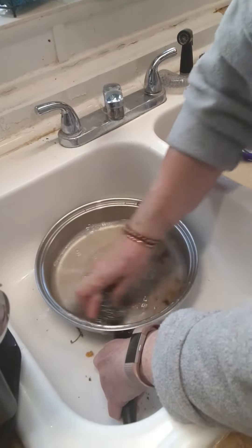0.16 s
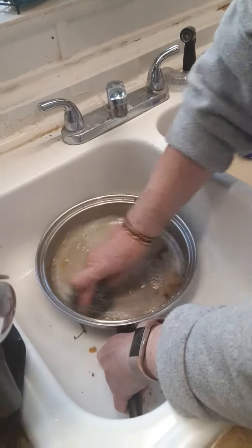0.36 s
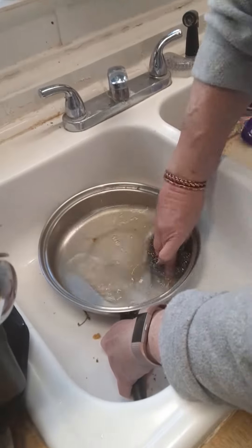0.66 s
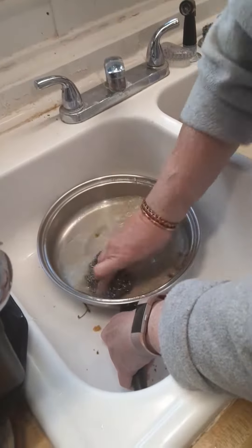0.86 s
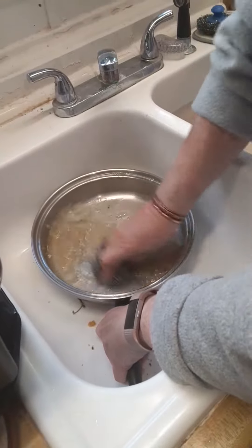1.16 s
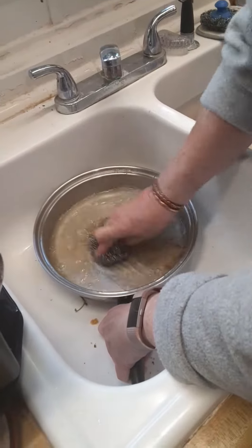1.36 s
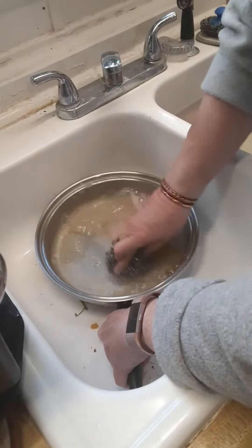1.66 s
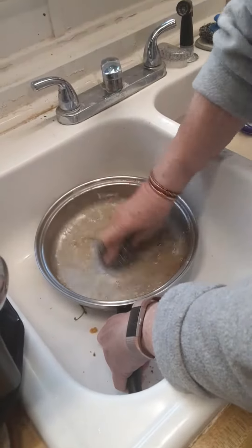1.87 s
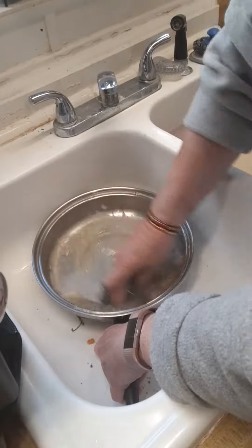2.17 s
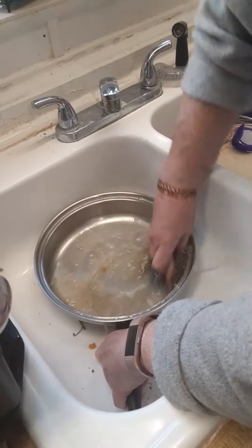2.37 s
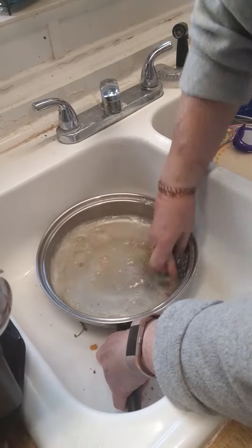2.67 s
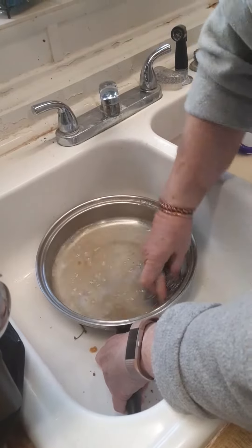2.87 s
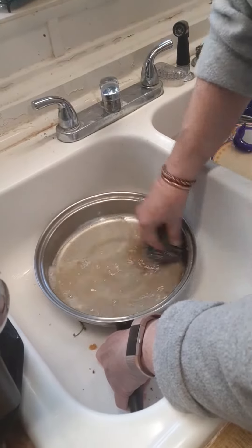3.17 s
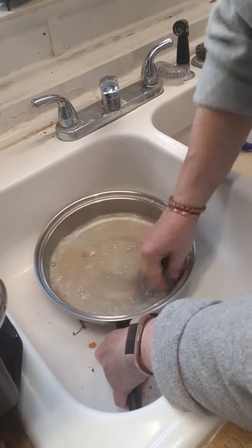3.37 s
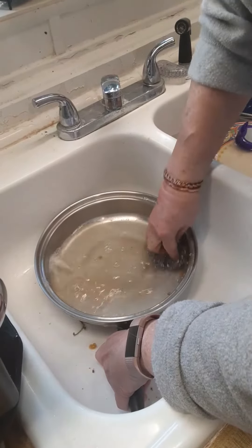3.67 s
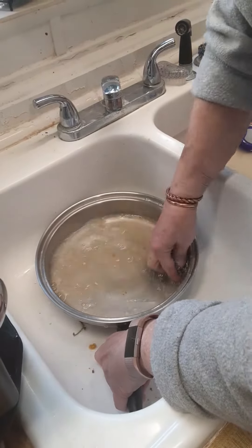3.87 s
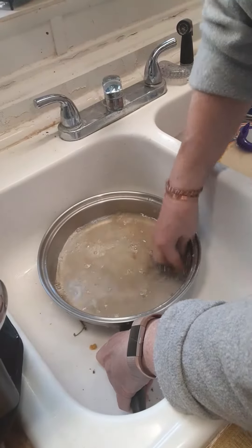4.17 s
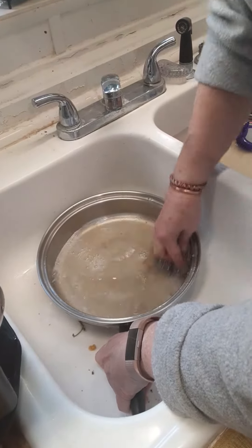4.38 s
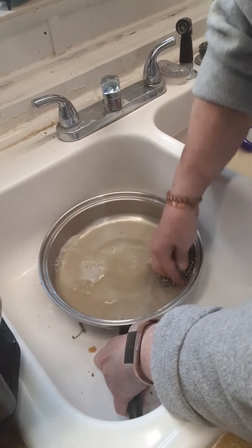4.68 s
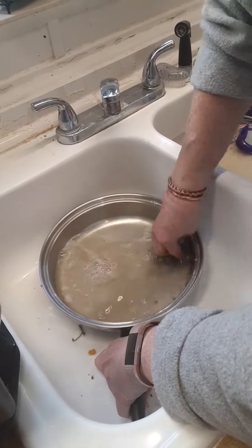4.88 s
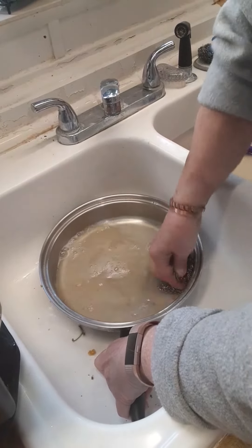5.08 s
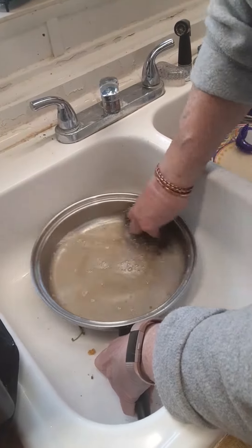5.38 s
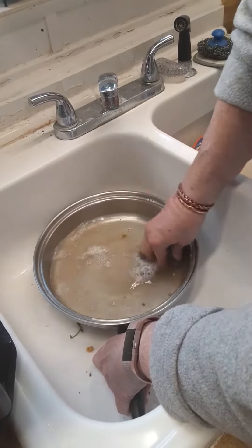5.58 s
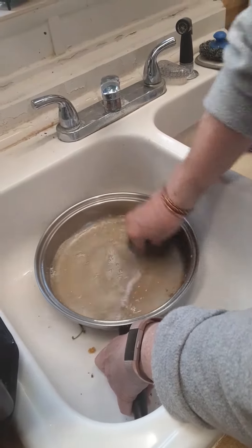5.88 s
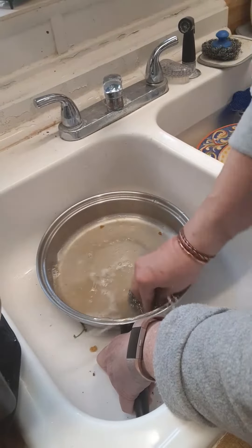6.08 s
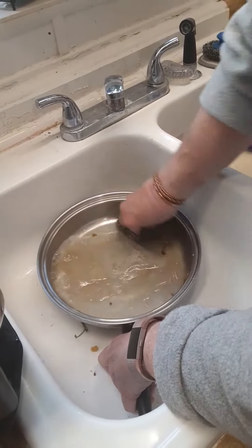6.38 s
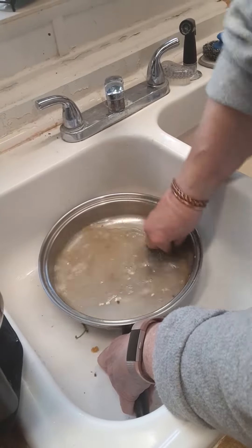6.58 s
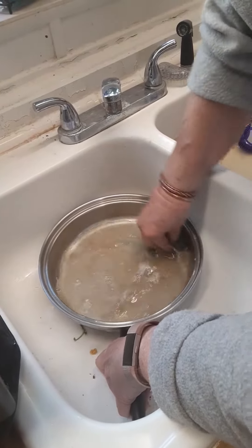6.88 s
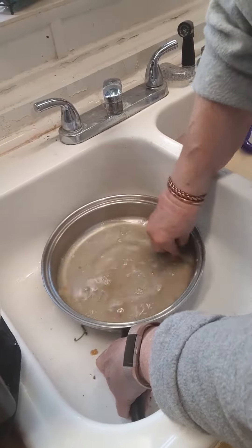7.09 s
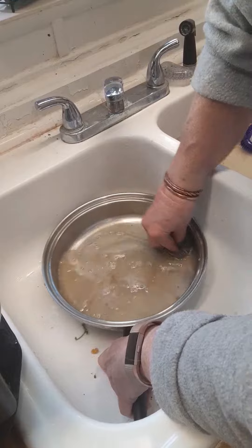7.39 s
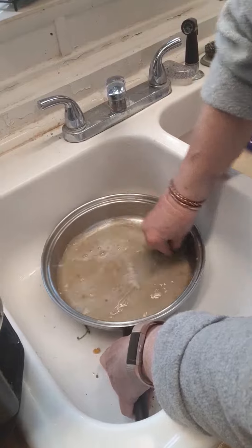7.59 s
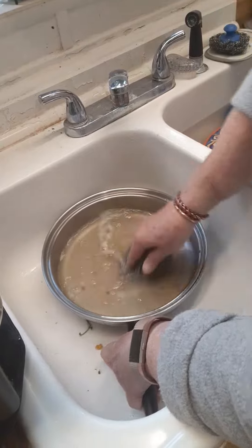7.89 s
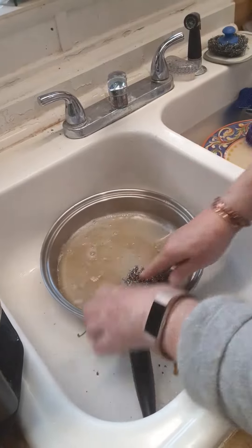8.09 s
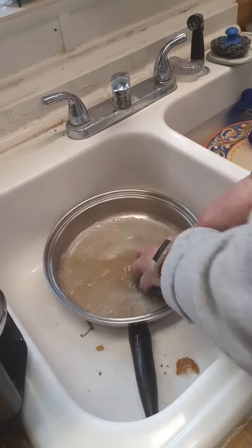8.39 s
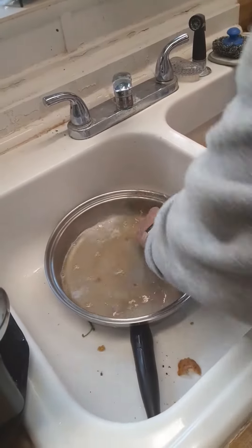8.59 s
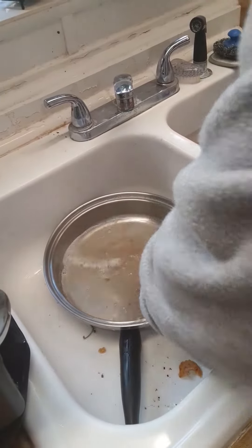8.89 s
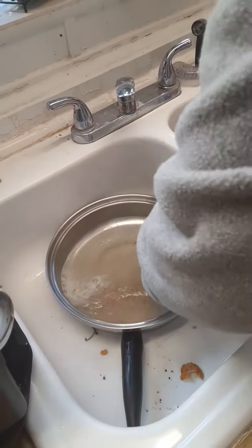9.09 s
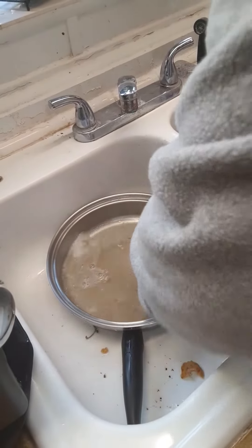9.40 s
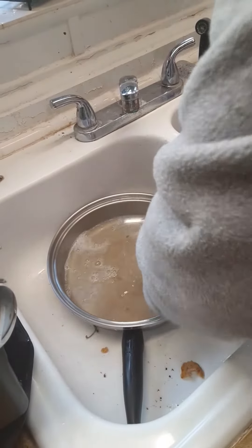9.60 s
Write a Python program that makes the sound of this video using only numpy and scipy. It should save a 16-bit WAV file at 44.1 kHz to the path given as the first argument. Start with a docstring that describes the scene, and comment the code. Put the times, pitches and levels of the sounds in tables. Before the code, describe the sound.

Close up in a quiet kitchen, a steel pan thumps in a sink as a wire scouring pad rasps around inside it in rapid, uneven strokes. Water plops and splashes, suds tick and the metal sings faintly. In the second half the pan rocks harder, giving runs of loud, ringing knocks. After a short lull, the wet scrubbing picks up again with lighter bumps.

```python
"""A wire scrubbing pad is rubbed to and fro in a steel pan half full of soapy water, in an enamel sink.
The wires hiss and tick on the steel, scrape through the water and set the pan singing.
The pan rocks and knocks on the basin; water plops, splashes snap and suds tick over a quiet kitchen.
Two microphone ports a few centimetres apart hear it, the left one first."""
import sys
import numpy as np
from scipy import signal
from scipy.fft import rfft, irfft, next_fast_len
from scipy.io import wavfile
from scipy.ndimage import uniform_filter1d, map_coordinates

SR = 44100
rng = np.random.default_rng(int(sys.argv[2]) if len(sys.argv) > 2 else 0)


def output_pcm(signal):
    """Save a mono or channel-first signal as 16-bit PCM at the path in sys.argv[1].

    Samples are clipped to [-1, 1] before scaling.
    """
    pcm = np.clip(np.atleast_2d(signal).T, -1, 1) * 32767
    wavfile.write(sys.argv[1], SR, np.round(pcm).astype(np.int16))


N = 429093


def amp(db):
    return 10 ** (np.asarray(db) / 20)


def unit_rms(x):
    return x / np.sqrt(np.mean(x ** 2) + 1e-20)


def along(points, hz):
    """Reads a curve of (freq_hz, value) points on a log frequency axis."""
    freqs, values = np.transpose(points)
    return np.interp(np.log(hz + 1), np.log(freqs + 1), values)


def eased(rows):
    """Turns rows of (time_s, values...) into one curve a column, easing in and out of every point."""
    times, *columns = np.transpose(rows)
    index = np.arange(len(times))
    position = np.interp(np.arange(N) / SR, times, index)
    position = np.floor(position) + np.sin(np.pi / 2 * (position % 1)) ** 2
    return [np.interp(position, index, column) for column in columns]


def wobble(rate):
    """A smooth random curve, rate knots a second."""
    return map_coordinates(rng.standard_normal(int(N * rate / SR) + 4), [np.arange(N) * rate / SR])


def filtered(x, response):
    """Filters x by a complex function of frequency."""
    size = next_fast_len(N + SR // 2)
    return irfft(rfft(x, size) * response(np.fft.rfftfreq(size, 1 / SR)), size)[..., :N]


def add(track, start_s, sound):
    """Mixes a sound into the track."""
    part = track[..., round(start_s * SR):][..., :sound.shape[-1]]
    part += sound[..., :part.shape[-1]]


def burst(spectrum, decay):
    """Stereo noise of energy about 1 a side, in which each frequency dies at its own speed."""
    hz, t, bins = signal.stft(rng.standard_normal((2, SR // 3)), SR, nperseg=128)
    shape = amp(along(spectrum, hz)[:, None] - 60 * t / along(decay, hz)[:, None])
    tail = signal.istft(bins * shape, SR, nperseg=128)[1]
    return tail / np.linalg.norm(tail[0])


# Stereo image of the noise, narrow lows and wide highs: freq_hz, correlation
PORT_LIKENESS = [(60, 0.77), (200, 0.99), (700, 0.56), (2000, 0.17), (5000, 0.053), (15000, 0.077)]

def rush(spectrum, grain_db, grain_rate, patchy_db):
    """Stereo noise of rms 1, lumpy in time and patchy in colour."""
    grainy = rng.standard_normal((2, N)) * amp(grain_db * wobble(grain_rate))
    bins = signal.stft(grainy, nperseg=256)[2]
    patches = uniform_filter1d(rng.standard_normal(bins.shape[1:]), size=5, axis=0)
    patches = unit_rms(uniform_filter1d(patches, size=10, axis=1))
    pair = signal.istft(bins * amp(patchy_db * patches), nperseg=256)[1][:, :N]

    def colour_and_width(hz):
        angle = np.arccos(np.clip(along(PORT_LIKENESS, hz), -1, 1)) / 2
        return amp(along(spectrum, hz)) * [np.cos(angle), np.sin(angle)]
    mid, side = filtered(pair, colour_and_width)
    return unit_rms(np.array([mid + side, mid - side]))


# Colour of the room tone: freq_hz, gain_db
ROOM_TONE = [(15, -62), (40, -22.5), (241, -12.5), (542, -14.5), (729, -10.5), (1010, -22), (1980, -35.5),
             (3490, -29.5), (4570, -25), (6850, -37), (15800, -25)]
# A faint hum in the room: pitch_hz, level_db
ROOM_HUM = [(737.5, -71)]

def kitchen():
    """A quiet bed of room tone with a wavering hum."""
    pitch_hz, level_db = ROOM_HUM[0]
    level = amp(level_db + 4 + 1.4 * wobble(2.8))
    hum = level * np.sin(2 * np.pi * pitch_hz * np.arange(N) / SR + 0.68 * wobble(9.2))
    return amp(-61) * rush(ROOM_TONE, grain_db=7, grain_rate=150, patchy_db=4.5) + hum


# Reverb decay of basin and room: freq_hz, t60_s
SINK_DECAY = [(100, .25), (500, 0.098), (2000, 0.09), (10000, 0.03)]

def sink_reverb(sound):
    """The basin walls and the room answer, with a fresh tail every third of a second."""
    out, step = np.zeros((2, N)), SR // 3
    for start in range(0, N, step):
        tail = burst([(100, 0)], SINK_DECAY)
        add(out, start / SR + 0.0026, signal.fftconvolve(sound[None, start:start + step], tail, axes=1))
    return out


def suds():
    """Small bubbles close at random in the stirred water, each a tiny rising ping."""
    out, t = np.zeros(N), np.arange(SR // 30) / SR
    for when, pitch, softness in rng.random((420, 3)):
        hz = 1500 * 4 ** pitch ** 1.5
        phase = 2 * np.pi * hz * t * (1 + 4 * t)
        envelope = amp(-14 * softness - 60 * t * hz / 50) * (1 - np.exp(-t / 0.00057))
        add(out, when * N / SR, envelope * np.sin(phase))
    return out


# Short pitched blips, water plops and a few brief rings of the pan: start_s, level_db, pitch_hz
PITCHED_BLIPS = [(0.0603, -39, 1990), (0.3395, -31, 2330), (.47, -38, 1850), (0.506, -34, 1840),
                 (.618, -42, 1930), (0.799, -33, 2060), (1.0867, -25.5, 1960), (1.1287, -30, 2780),
                 (1.1318, -32, 1770), (1.137, -32.5, 1290), (1.153, -37, 1750), (1.243, -43, 1070),
                 (1.4825, -32, 2030), (1.501, -39, 1180), (1.518, -33, 2020), (1.839, -30.5, 1440),
                 (1.8716, -33, 2170), (1.925, -50, 2100), (1.955, -46, 1970), (1.9774, -34.5, 2840),
                 (2.01, -30, 1310), (2.058, -46, 1860), (2.104, -21.5, 4910), (2.112, -38, 1120),
                 (2.125, -27, 2280), (2.14, -35, 1765), (2.1864, -37.5, 2170), (2.2794, -21, 4900),
                 (2.317, -26, 2160), (2.318, -16.5, 2970), (2.324, -14, 4340), (2.873, -43, 1930),
                 (3.5007, -30, 1770), (3.78, -31.5, 2020), (5.12, -20, 4200), (5.3028, -28, 2040),
                 (5.338, -32, 2070), (5.769, -30.5, 2000), (5.979, -34, 3770), (6.5744, -38, 1590),
                 (7.343, -34, 1430), (9.319, -43, 1960)]

def blips(pitch_spread=0.07, scatter_s=0.0018):
    """Each blip is six close, damped tones that rise a little, like a crowd of bubbles of like size."""
    out, t = np.zeros((2, N)), np.arange(SR // 20) / SR
    for start_s, level_db, pitch_hz in PITCHED_BLIPS:
        age = t * np.sqrt(pitch_hz * 2000) / 20  # 1 at 60 dB down: 20 cycles for a 2 kHz tone
        for skew, detune, late, size in rng.normal(0, 1, (6, 4)):
            hz = pitch_hz * (1 + pitch_spread * detune)
            phase = 2 * np.pi * hz * t * (1 + 0.02 * np.minimum(age, 1)) + [[skew], [-skew]]
            envelope = amp(level_db + 2 * size - 60 * age ** 1.6) * (1 - np.exp(-t / 0.001))
            add(out, start_s + scatter_s * abs(late), envelope * np.sin(phase))
    return out


# Small splashes and snapping wires: start_s, level_db, body_db (relative to level_db)
SPLASH_SNAPS = [(0.332, -27, 1), (0.795, -35, -4), (0.7433, -32, 7.5), (0.879, -25.5, -25),
                (0.899, -22.5, -14), (1.133, -31, 8.5), (1.146, -19.5, -10), (1.5, -29, -20),
                (1.5214, -18, -3.5), (1.9, -34, 3), (1.9634, -28, -20), (2.0208, -25, -5),
                (2.0993, -25, -17), (2.104, -20.5, 1.5), (2.158, -38, -24.5), (2.1715, -35, -18),
                (2.215, -23, -25), (2.278, -26.5, -24), (2.3156, -23, -4), (3.377, -22, -22),
                (4.111, -35, -4), (4.155, -21, -21), (4.559, -35, -28), (5.507, -21, -52),
                (5.6433, -37, -22), (5.6747, -24, -2.5), (5.709, -18.5, -21), (5.93, -23.5, -22),
                (6.0583, -37.5, -17), (6.499, -25, -2), (7.5913, -43, -19), (7.646, -22, -9.5),
                (7.8445, -27, -4.5), (7.9086, -29.5, 2.5), (7.97, -43.5, 2), (8.135, -51, 4.5),
                (8.373, -39, 3), (8.088, -42.5, -8), (8.453, -24.5, 4), (8.727, -23.5, -25),
                (8.901, -19, -27), (8.965, -20.5, -3.5), (9.101, -19.5, -24), (9.319, -29, -43),
                (9.3454, -25.5, -38), (9.385, -22, -25), (9.45, -31, -20), (9.62, -41, -22)]

def snaps():
    """A bright crack over a splashy body; the wetter the body, the longer it lasts."""
    out, t = np.zeros(N), np.arange(SR // 10) / SR
    wet_band = signal.butter(2, [1600, 5200], "band", fs=SR, output="sos")
    crack_band = signal.butter(2, 9000, "high", fs=SR, output="sos")
    crack_shape = (amp(1 - 60 * t / 0.012) + amp(-12 - 60 * t / 0.03)) * (1 - np.exp(-t / 0.0005))
    for start_s, level_db, body_db in SPLASH_SNAPS:
        t60_s = 0.018 + 0.00067 * max(body_db + 11, 0)
        body_shape = amp(body_db - 60 * t / t60_s) * (1 - np.exp(-t / 0.0021))
        crack = crack_shape * unit_rms(signal.sosfilt(crack_band, rng.standard_normal(len(t))))
        body = body_shape * unit_rms(signal.sosfilt(wet_band, rng.standard_normal(len(t))))
        add(out, start_s, amp(level_db) * (crack + body))
    return out


# Colour of the thud in a knock: freq_hz, gain_db
THUD_COLOUR = [(300, 4.5), (1000, 1.5), (2500, -16), (4200, -15.5), (6000, -26.5), (16000, -57)]

def thud(knock_eq):
    """Modes too dense to tell apart die away as noise, partly shared by both ports."""
    spectrum = [(hz, gain_db + along(knock_eq, hz)) for hz, gain_db in THUD_COLOUR]
    noise = burst(spectrum, decay=[(300, 0.12), (2500, 0.11), (8000, 0.0099)])
    return noise + 0.45 * noise[::-1]


# Modes of pan and basin: pitch_hz, level_db, t60_s
PAN_MODES = [(107.1, -14.5, 0.54), (163.4, -12, 0.36), (181.2, 11, 0.16), (225.5, -13.5, 0.45),
             (286, 7, 0.067), (329.5, -1.5, 0.18), (419, 5.5, 0.066), (526, -7.5, 0.25), (574.8, -1, 0.15),
             (620.6, 8.5, 0.077), (677.6, -13.5, 0.23), (794, -6, 0.052), (869, -6.5, 0.11),
             (951, -5, 0.075), (1029.6, -9.5, 0.15), (1070, -0.5, 0.064), (1350, -20, 0.096),
             (1410, -27.5, 0.11), (1518, -20, 0.16), (1740, -39, 0.093), (1883, -22, 0.075),
             (1897, -20, 0.038), (2060, -23, 0.1), (2810, -30, .08), (3930, -30, .05)]
# The pan hits the basin, with low, mid and high trims: start_s, level_db, boom_db, bell_db, clang_db
PAN_KNOCKS = [(0.176, 1.5, -21, -17, -18), (0.401, -26.5, -12, -31, -34), (0.749, -47.5, -20, 10, -14),
              (0.778, -48, -23, -22, 11.5), (1.606, -28, -10, -13, -46), (2.26, -26, -28, -31, -28),
              (2.395, -12.5, -10.5, -15, -21), (2.412, -31.5, -10, 3, -32), (2.431, -39, -20, -13, -25),
              (2.999, -18.5, -12.5, -11.5, -26), (3.058, -46, 15, -25, -13), (3.112, -44.5, 7, 7, 5),
              (3.5, -33, 0, -25, -30), (3.586, -18, -18, -15, -33), (3.609, -30, 1, 1, 1.5),
              (3.759, -15.5, -14, -16.5, -28), (3.915, -31, -4, -28, -37), (3.961, -33.5, -29, 0.5, -3),
              (4.111, -14, -20.5, -18.5, -19), (4.313, -43, -2, 5, 6), (4.417, -29, -8, -29, -33),
              (4.504, -30, -5, -14, -29), (4.691, -43.5, -26, 11, -8), (5.163, -31, -39, 7, -1),
              (5.257, 3.5, -14, -18.5, -18), (5.28, -9, -11, -6, -17), (5.3, -16.5, -21, -7, -8),
              (5.338, -24, -20, -7, -12), (5.366, -27, -27, -5, -21), (5.394, -5, -12, -3.5, -0.5),
              (5.421, -20, -33, -17, 0), (5.632, -11.5, -12.5, -38, -37), (5.659, -29, 5.5, 5, 0.5),
              (5.685, -42, -6, -28, -29), (5.79, -10, -18, -5.5, -6.5), (5.928, -30.5, -10, -8.5, -33),
              (6.213, -11, -11.5, -14, -20), (6.437, -30, -3.5, -12, -27),
              (6.759, -18.5, -16.5, -17.5, -19), (6.666, -30.5, -7, -29, -37.5),
              (6.812, -31, 0.5, -22, -34.5), (6.863, 0, -16.5, -22, -15), (6.874, -12, -18, 1, -17),
              (6.993, -6, -20, -14, -19.5), (7.105, 3.5, -15, -28, -15.5),
              (7.128, -15.5, -11.5, -1.5, -12.5), (7.188, -24, -20, -10, -9), (7.206, -4, -14.5, -3, -2.5),
              (7.228, -27, -21, -8, -14), (7.363, 0.5, -13.5, -14.5, -14.5),
              (7.375, -16.5, -20, -13.5, -10.5), (7.442, -11, -12, -2, -5.5),
              (7.627, -27.5, -11.5, -36, -36), (8.251, -39.5, -1, -16, -17), (8.449, -39, -32, 7, 2),
              (8.507, -27, -34, -6, -5), (8.581, -40, -3, 2, -4), (8.72, -19.5, -9.5, -18.5, -32),
              (8.885, -34.5, 1, -22, -28), (8.979, -35, -4, -23, -20), (9.099, -32, -11, -18, -13),
              (9.31, -39.5, 0, -16, -32), (9.365, -27.5, -17, -18, -22), (9.52, -26.5, -13, -26, -4.5)]

def knocks(detune=0.01):
    """Each knock rings the modes at new strengths; the broad basin floor booms late."""
    out, t = np.zeros((2, N)), np.arange(SR // 3) / SR
    hz, mode_db, t60_s = np.transpose(PAN_MODES)[:, :, None]
    attack_s = along([(190, 0.021), (215, 0.00074), (3000, 0.00098)], hz)
    attack = (1 - np.exp(-t / attack_s)) ** 2
    for start_s, level_db, boom_db, bell_db, clang_db in PAN_KNOCKS:
        knock_eq = [(200, boom_db + 20), (215, 0.0077), (470, 0.0072), (600, bell_db + 8.5),
                    (750, bell_db + 13.5), (1050, clang_db + 13.5), (2200, clang_db + 22)]
        strength = amp(mode_db + along(knock_eq, hz) + rng.normal(0, 2.2, hz.shape))
        shifted_hz = hz * rng.normal(1, detune, hz.shape)  # water and grip shift the modes
        modes = np.exp((2j * np.pi * shifted_hz - np.log(1000) / t60_s) * t) * attack
        # the higher modes reach the two ports out of step
        skew = rng.normal(0, 1, hz.shape) * along([(200, 0.023), (600, 0.34), (2000, 1.0)], hz)
        ring = [np.imag((strength * np.exp(1j * side * skew))[:, 0] @ modes) for side in (1, -1)]
        add(out, start_s + 0.00143, amp(level_db - 14) * np.array(ring))
        add(out, start_s + 0.003, amp(level_db + 10.5) * thud(knock_eq))
    # a low cut at 120 Hz keeps deep bass out of the knocks
    return filtered(out, lambda hz: (1j * hz / 120 / (1 + 1j * hz / 120)) ** 3)


def shudder(rise_s=0.032):
    """The envelope of the pan shaking on after each knock."""
    out, age = np.zeros(N), np.arange(SR // 2) / SR / rise_s
    for start_s, level_db, *_ in PAN_KNOCKS:
        add(out, start_s, amp(level_db - 30) * age ** 2 * np.exp(2 - 2 * age))
    return out


def pan_singing(tilt_db_per_octave=13.5):
    """Friction noise rings the modes of the pan; rubbing favours the upper ones."""
    def resonances(hz):
        response = 0
        for pitch_hz, level_db, t60_s in PAN_MODES:
            gain = amp(level_db + tilt_db_per_octave * np.log2(pitch_hz / 180)) / np.sqrt(t60_s)
            response += gain * 1j * hz / (pitch_hz ** 2 - hz ** 2 + 1j * hz * 1.2 / t60_s)
        return response
    return unit_rms(filtered(rng.standard_normal(N), resonances))


# Colour of the rubbing carried by the basin: freq_hz, gain_db
RUMBLE_COLOUR = [(15, -75.5), (25, -47), (49, -11), (119, -21.5), (173, -1), (210, -3), (284, -8),
                 (340, -10.5), (479, -10.5), (583, -7), (741, -45.5), (775, -32.5), (900, -11.5),
                 (1170, -40), (1980, -120)]

def basin_rumble(level_db):
    """Rubbing and the shuddering pan shake a lumpy low end out of the basin."""
    level = amp(level_db + 1.5 * wobble(14)) + shudder()
    return level * rush(RUMBLE_COLOUR, grain_db=2, grain_rate=27, patchy_db=0.2)


# Colour of the rubbing heard through the water: freq_hz, gain_db
SCRAPE_COLOUR = [(410, -29.5), (700, -12.5), (845, -8.5), (967, -19), (1050, -4.5), (1160, -18), (1410, -9),
                 (1700, -9), (1870, -5), (2150, -5), (2380, -10.5), (3300, -10), (6000, -12), (7800, -43),
                 (13200, -120)]

def wet_scrape(level_db):
    """Wires slipping under water make a grainy midrange."""
    return amp(level_db) * rush(SCRAPE_COLOUR, grain_db=1, grain_rate=190, patchy_db=3)


# Colour of wire on steel, for hiss and ticks: freq_hz, gain_db
WIRE_COLOUR = [(1800, -14), (3300, -6.5), (4700, -1), (5700, -2), (8700, 3.5), (10100, 1), (11900, 2.5),
               (12100, 5.5), (12500, 2), (14000, 2), (15500, -0.5)]

def wire_hiss(level_db):
    """Many wires slip at once and blur into a bright hiss."""
    return amp(level_db) * rush(WIRE_COLOUR, grain_db=0, grain_rate=1400, patchy_db=2.1)


def wire_ticks(per_s=600, spread_db=4):
    """Single wires catch and spring free: clicks of very uneven size, scattered between the ports."""
    when, rank, side = rng.random((int(per_s * N / SR), 3)).T
    size_db = -spread_db * np.log(1 - rank * 0.995)  # exponential spread, the biggest capped
    size = amp(size_db) * rng.choice([-1, 1], len(rank))
    shares = np.cos(side * np.pi), np.sin(side * np.pi)
    hits = [np.bincount((when * N).astype(int), size * share, N) for share in shares]
    click = amp(-60 * np.arange(SR // 200) / SR / 0.0068) * rng.standard_normal((2, SR // 200))
    clicks = signal.fftconvolve(hits, click, axes=1)[:, :N]
    return unit_rms(filtered(clicks, lambda hz: amp(along(WIRE_COLOUR, hz))))


# Overlapping swells of scrubbing hiss, strokes and the rubbing between them: peak_s, length_s, hiss_db
HISS_SWELLS = [(0, 0.42, -38.5), (0.163, 0.049, -37.5), (0.36, 0.48, -40.5), (0.518, 0.098, -34.5),
               (0.733, 0.43, -39.5), (0.895, 0.093, -45.5), (1.003, 0.14, -41.5), (1.118, 0.12, -36),
               (1.243, 0.28, -40.5), (1.33, 0.12, -41.5), (1.433, 0.092, -36.5), (1.539, 0.13, -36),
               (1.668, 0.22, -41), (1.787, 0.11, -40.5), (1.925, 0.26, -41.5), (2.017, 0.17, -41),
               (2.14, 0.25, -36.5), (2.321, 0.17, -32.5), (2.535, 0.39, -39.5), (2.658, 0.12, -32),
               (2.858, 0.3, -37.5), (3.094, 0.072, -34), (3.194, 0.28, -37), (3.306, 0.11, -32),
               (3.492, 0.3, -34), (3.578, 0.097, -37), (3.74, 0.22, -35), (3.915, 0.17, -35.5),
               (4.139, 0.2, -36.5), (4.288, 0.11, -35.5), (4.332, 0.065, -36.5), (4.462, 0.19, -36.5),
               (4.577, 0.073, -35), (4.703, 0.11, -33.5), (4.869, 0.17, -34.5), (4.981, 0.081, -36.5),
               (5.18, 0.28, -33), (5.333, 0.081, -54.5), (5.408, 0.13, -39), (5.518, 0.11, -31),
               (5.7, 0.21, -38), (5.863, 0.18, -38.5), (5.95, 0.14, -39), (6.124, 0.16, -45.5),
               (6.232, 0.14, -37), (6.322, 0.15, -41.5), (6.478, 0.15, -38.5), (6.614, 0.15, -37.5),
               (6.742, 0.11, -36.5), (6.872, 0.14, -36.5), (6.998, 0.088, -31), (7.123, 0.11, -34.5),
               (7.254, 0.1, -37), (7.381, 0.096, -35), (7.516, 0.14, -41), (7.65, 0.11, -41.5),
               (7.755, 0.21, -47.5), (7.88, 0.22, -45.5), (8.255, 0.19, -45.5), (8.358, 0.14, -51.5),
               (8.482, 0.51, -48), (8.685, 0.22, -40), (8.938, 0.22, -36.5), (9.126, 0.12, -35),
               (9.272, 0.23, -50.5), (9.371, 0.11, -34), (9.523, 0.098, -33.5), (9.607, 0.13, -50),
               (9.72, 0.11, -41)]

def hiss_envelope(rise_share=0.58, end_drop_db=12, resting_db=-83.5):
    """The hiss level in dB: overlapping swells rise and fade, adding in power."""
    peak_s, length_s, hiss_db = np.transpose(HISS_SWELLS)[:, :, None]
    t = np.arange(0, N / SR, 1 / 200)
    from_peak = (t - peak_s) / (length_s * np.where(t < peak_s, rise_share, 1 - rise_share))
    swells = amp(hiss_db - end_drop_db * np.abs(from_peak) ** 2.07)  # rounded tops
    power = np.sum(swells ** 2, axis=0) + amp(resting_db) ** 2
    return np.interp(np.arange(N) / SR, t, 10 * np.log10(power))


# Slow fader rides as the pad bears on the pan: time_s, scrape_db, rumble_db, singing_db
PAD_BEARING = [(0.0, -49, -53, -59.5), (0.35, -44.5, -53.5, -52), (0.78, -47, -55, -57),
               (1.3, -44.5, -55.5, -55.5), (1.87, -46, -57, -62), (2.35, -41.5, -47.5, -53),
               (2.9, -49.5, -54.5, -70), (3.42, -38.5, -49.5, -48), (3.9, -47.5, -54.5, -76),
               (4.5, -47, -54, -56), (5.1, -48.5, -50, -59), (5.96, -49, -55, -54), (6.4, -48.5, -54, -57),
               (7.1, -42.5, -55, -60), (7.45, -46, -54, -45), (7.67, -56.5, -58, -70),
               (8.0, -60.5, -70, -72), (8.19, -75, -78, -80), (8.27, -49.5, -61.5, -65),
               (8.4, -51, -61, -72), (8.6, -47.5, -52, -55.5), (8.95, -49, -52.5, -53.5),
               (9.35, -49.5, -54, -55), (9.73, -50.5, -54, -59)]

def scrubbing(linger_s=0.037):
    """The rubbing drives the wires, water, pan and basin together; the suds follow the scrape's fader."""
    hiss_db = hiss_envelope()
    scrape_db, rumble_db, singing_db = eased(PAD_BEARING)
    swing_db = hiss_db - uniform_filter1d(hiss_db, size=SR // 3)
    lingering_db = uniform_filter1d(swing_db, size=round(linger_s * SR))  # pan and water smooth it over
    uneven = wobble(30)
    hiss = wire_hiss(hiss_db + 1.1 * uneven)
    scrape = wet_scrape(scrape_db + 0.86 * lingering_db + 1.5 * uneven)
    rumble = basin_rumble(rumble_db + 0.81 * swing_db)
    singing = amp(singing_db + 0.73 * lingering_db) * pan_singing()
    ticks = amp(hiss_db - 8) * wire_ticks()
    return hiss + ticks + scrape + rumble + singing + amp(scrape_db + 5.5) * suds()


def scene():
    """The full mix; only blips and snaps feed the reverb."""
    accents = blips() + snaps()
    return knocks() + accents + amp(-10) * sink_reverb(accents[0]) + scrubbing() + kitchen()


# EQ of the right port against the left: freq_hz, gain_db
RIGHT_PORT_EQ = [(40, -2.3), (150, -1.3), (700, -2.5), (1400, -1.5), (2800, .8), (5500, -1.4),
                 (10000, -2.2), (14000, 0)]

def record(dry, lag_s=0.00016, ceiling=0.97, top_hz=15550):
    """The ports differ in arrival time and colour; loud knocks round off; the very top is cut."""
    def ports(hz):
        # in the lows the whole basin sounds, and both ports hear it together
        delay_s = lag_s * hz ** 2 / (hz ** 2 + 1260 ** 2)
        right = np.exp(-2j * np.pi * hz * delay_s) * amp(along(RIGHT_PORT_EQ, hz))
        return np.array([np.ones_like(hz), right])
    heard = filtered(dry, ports)
    rounded = heard / (1 + np.abs(heard / ceiling) ** 8) ** (1 / 8)
    return filtered(rounded, lambda hz: hz < top_hz)


dry = scene()
out = record(dry)
output_pcm(out)
```